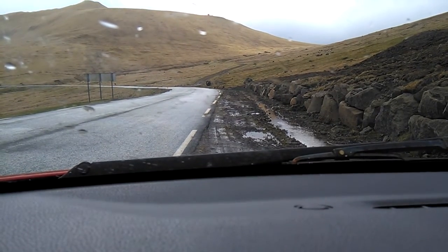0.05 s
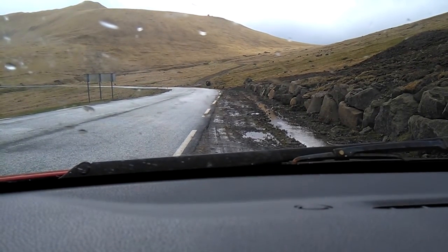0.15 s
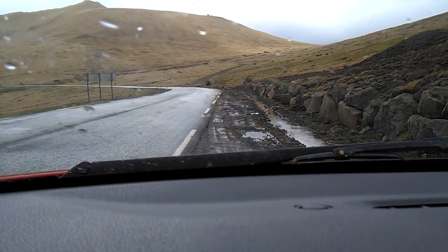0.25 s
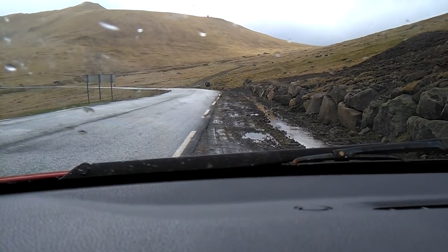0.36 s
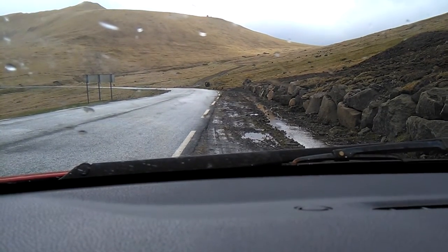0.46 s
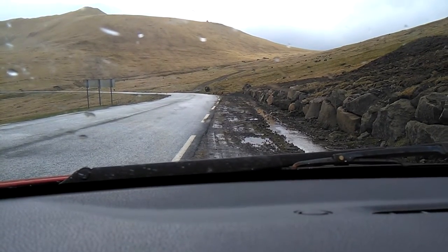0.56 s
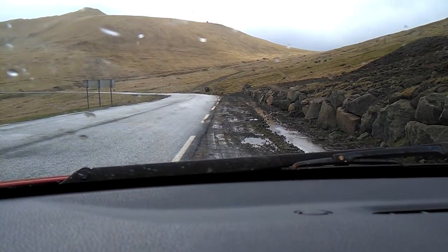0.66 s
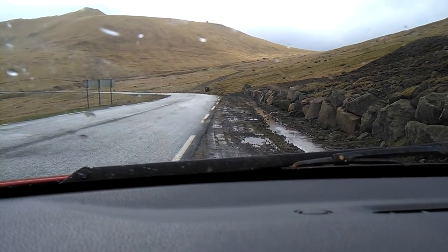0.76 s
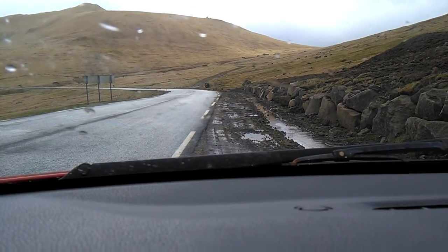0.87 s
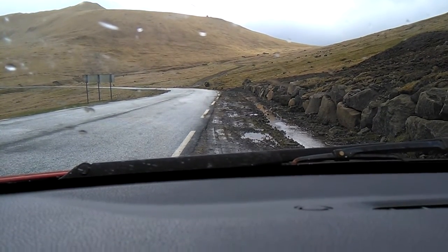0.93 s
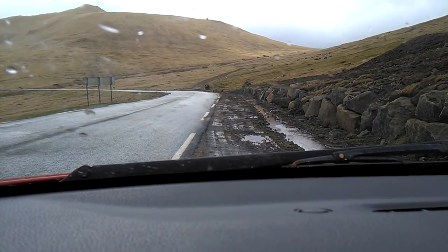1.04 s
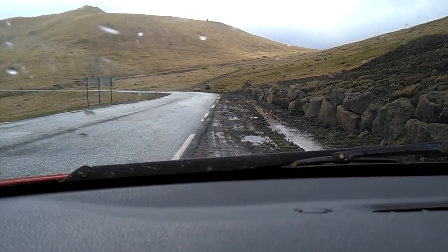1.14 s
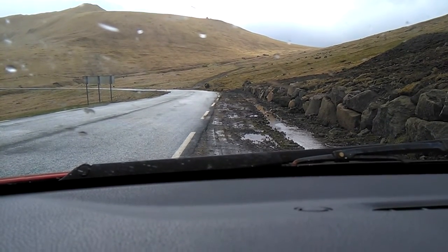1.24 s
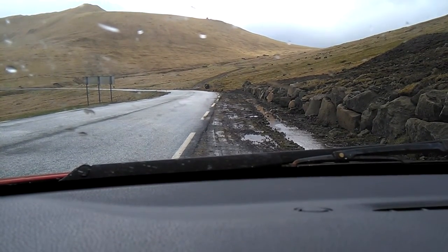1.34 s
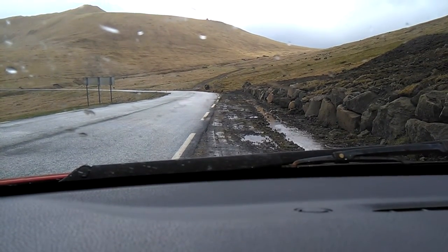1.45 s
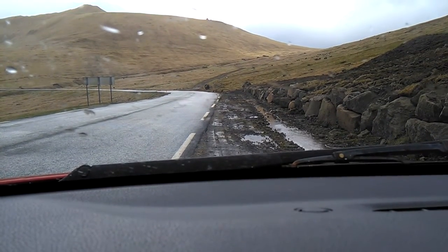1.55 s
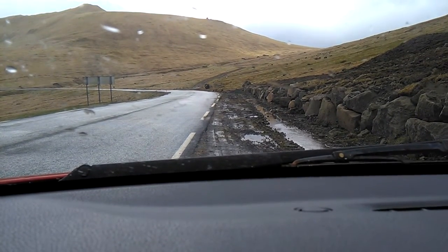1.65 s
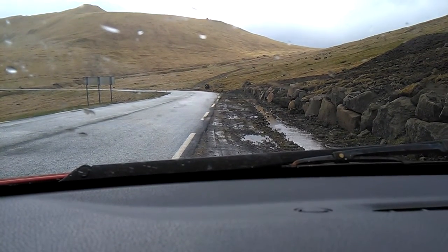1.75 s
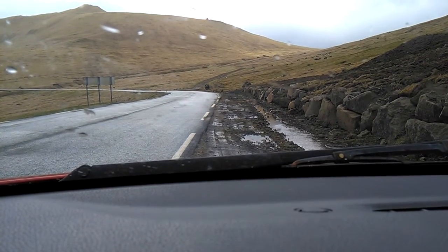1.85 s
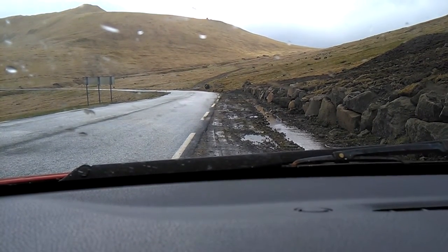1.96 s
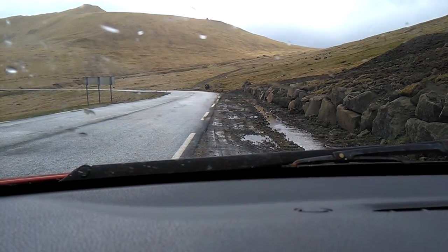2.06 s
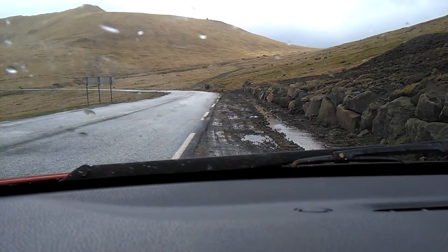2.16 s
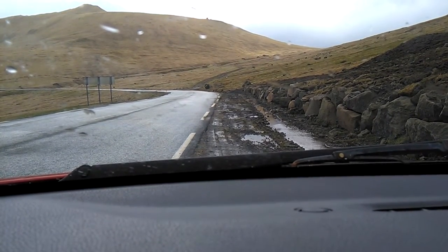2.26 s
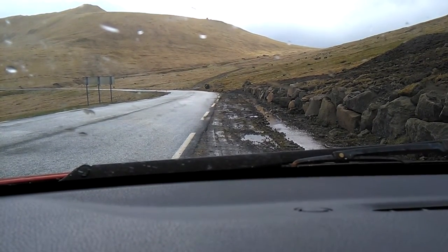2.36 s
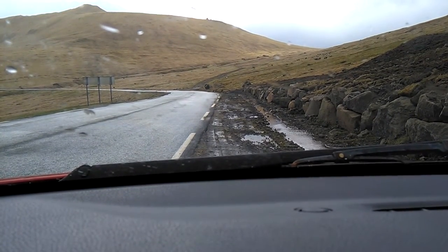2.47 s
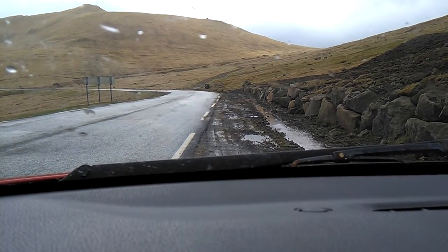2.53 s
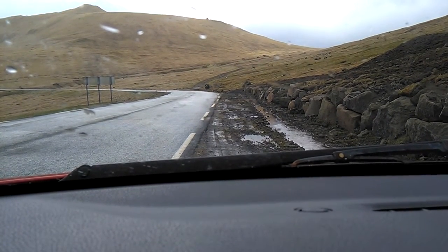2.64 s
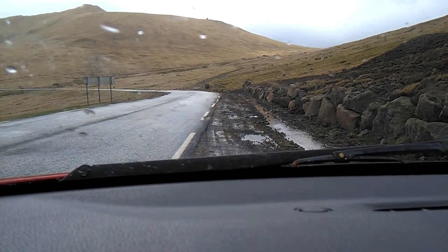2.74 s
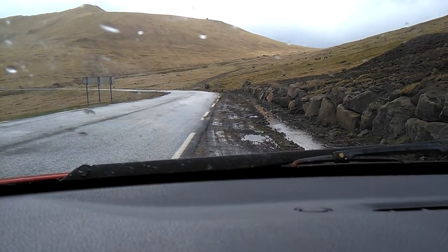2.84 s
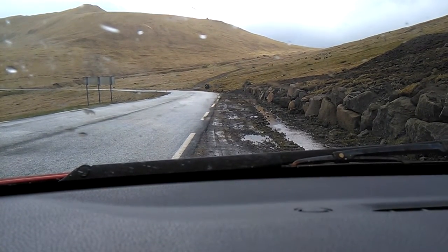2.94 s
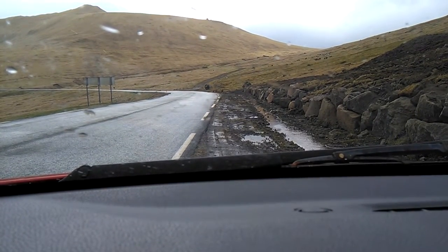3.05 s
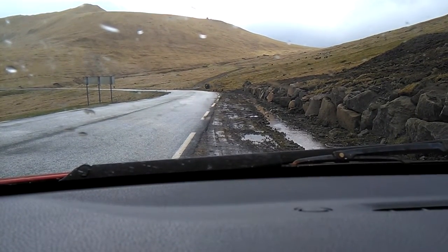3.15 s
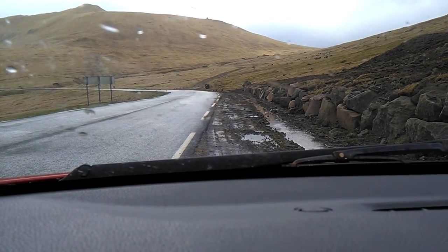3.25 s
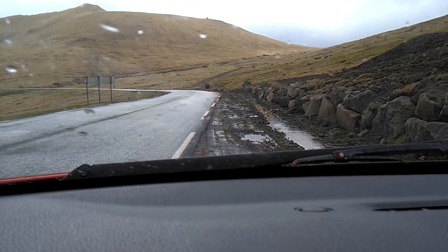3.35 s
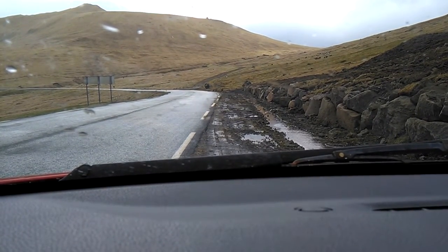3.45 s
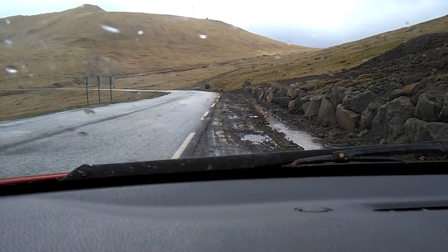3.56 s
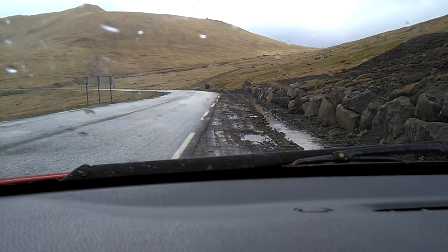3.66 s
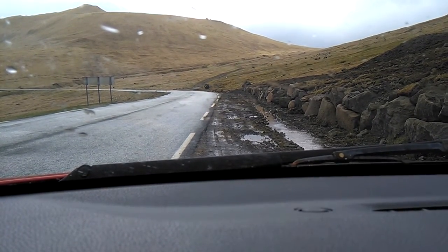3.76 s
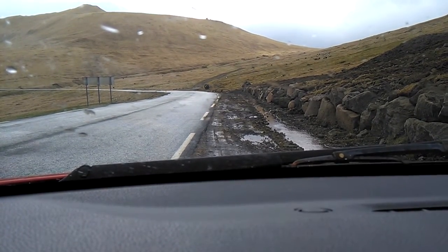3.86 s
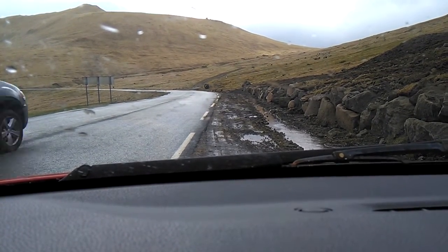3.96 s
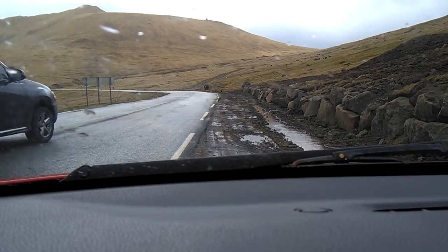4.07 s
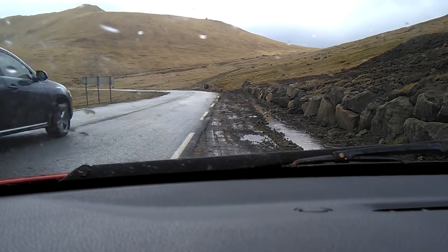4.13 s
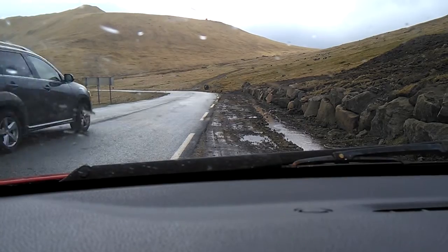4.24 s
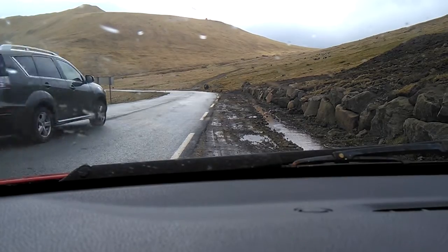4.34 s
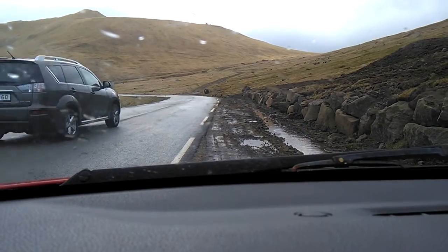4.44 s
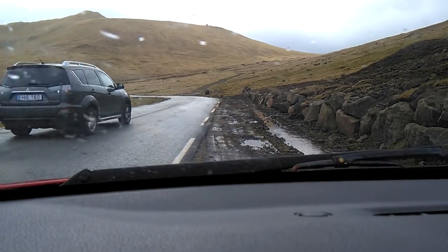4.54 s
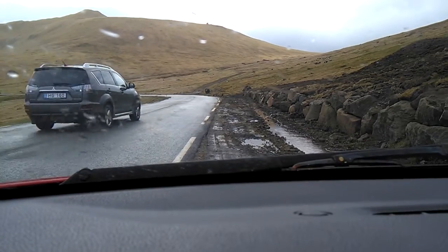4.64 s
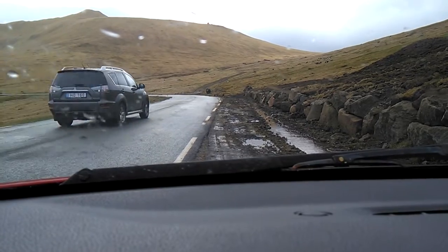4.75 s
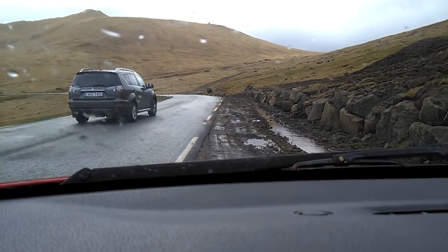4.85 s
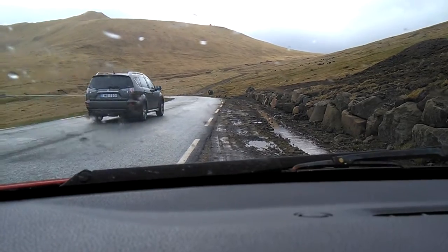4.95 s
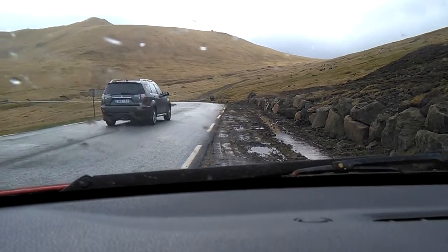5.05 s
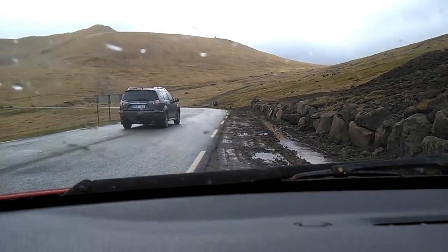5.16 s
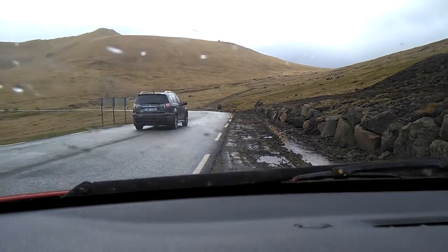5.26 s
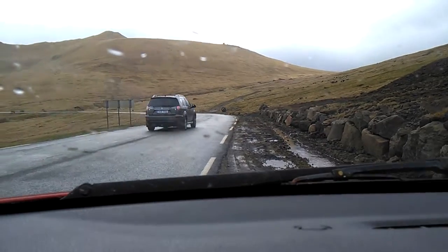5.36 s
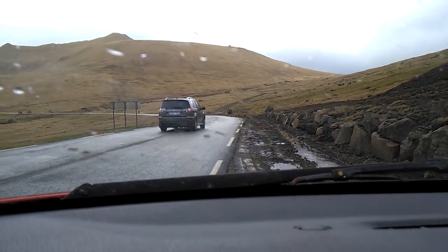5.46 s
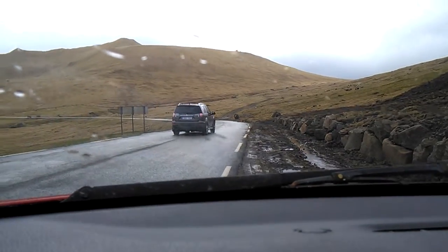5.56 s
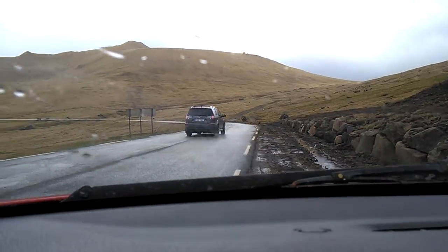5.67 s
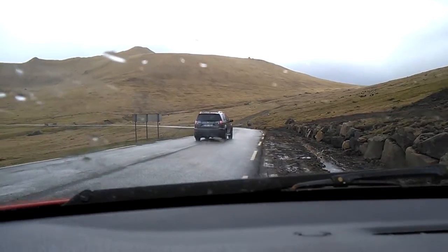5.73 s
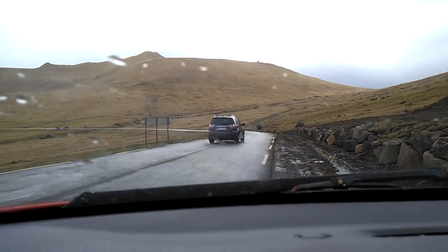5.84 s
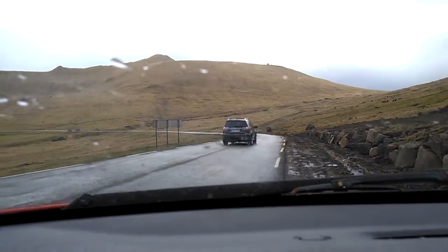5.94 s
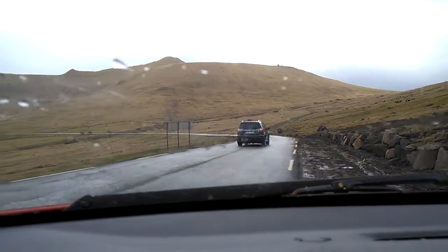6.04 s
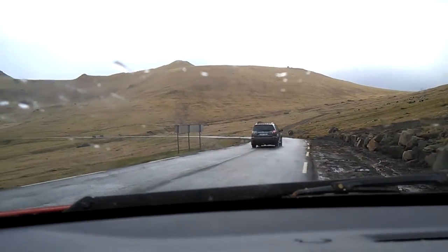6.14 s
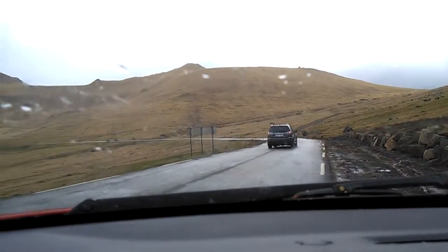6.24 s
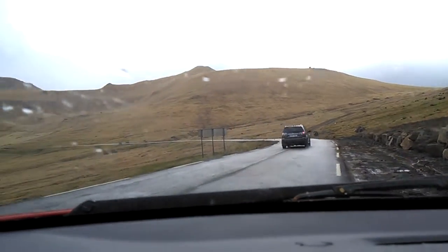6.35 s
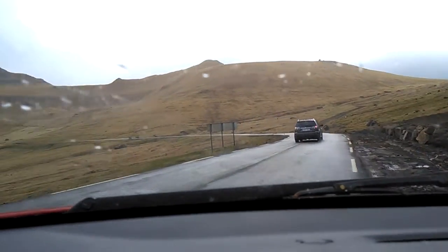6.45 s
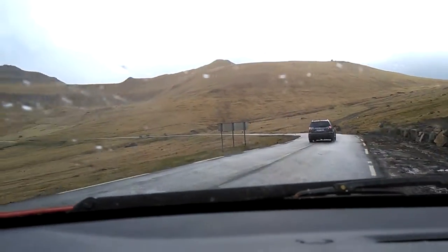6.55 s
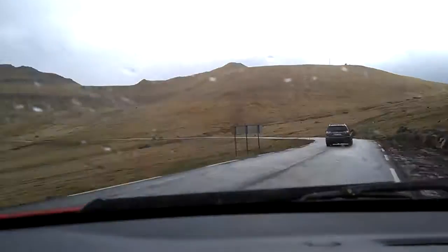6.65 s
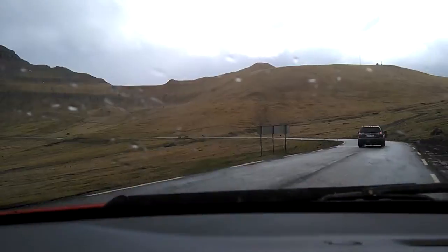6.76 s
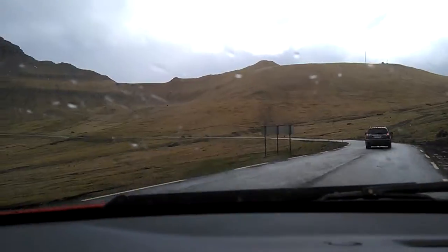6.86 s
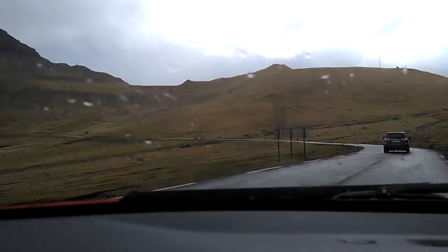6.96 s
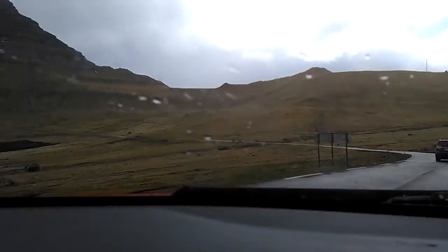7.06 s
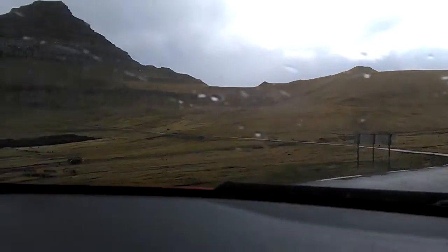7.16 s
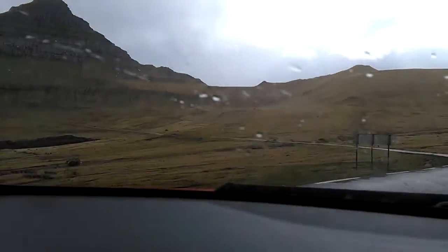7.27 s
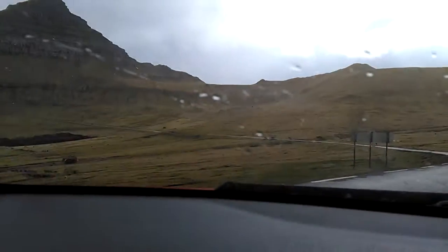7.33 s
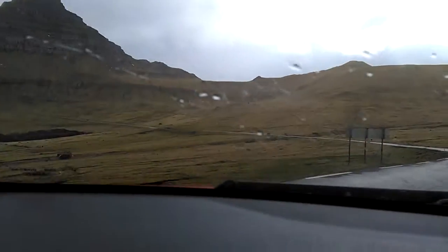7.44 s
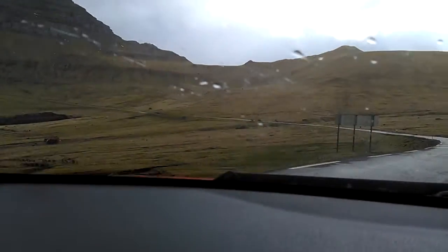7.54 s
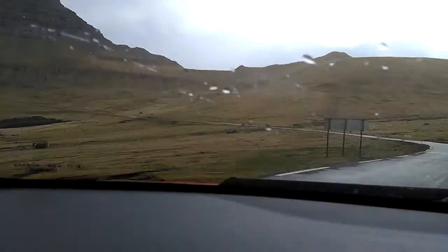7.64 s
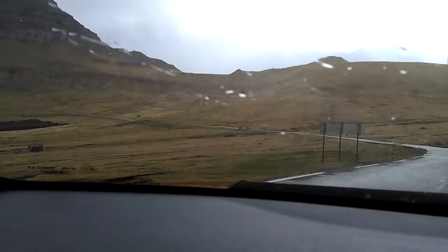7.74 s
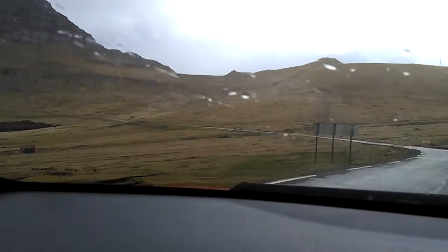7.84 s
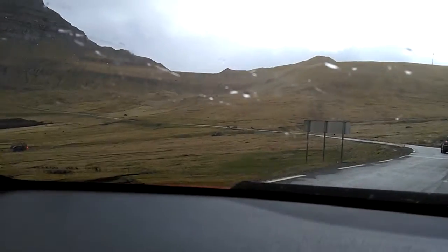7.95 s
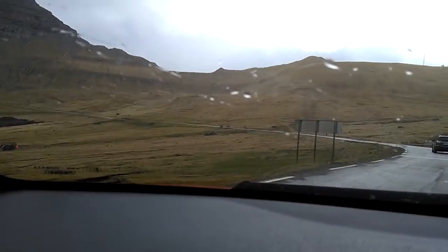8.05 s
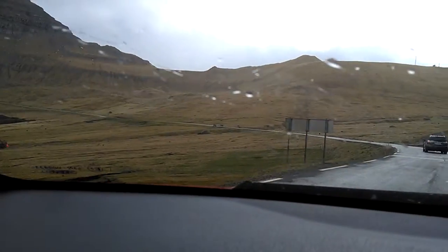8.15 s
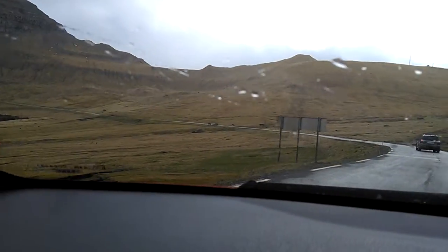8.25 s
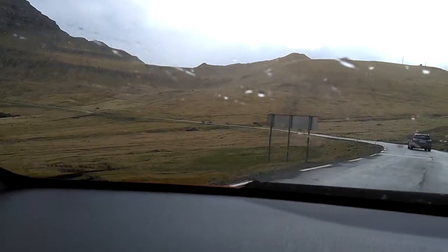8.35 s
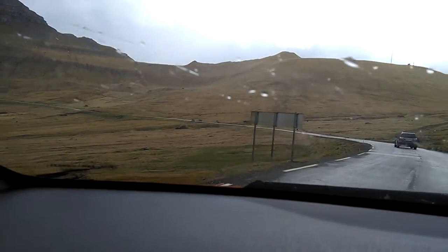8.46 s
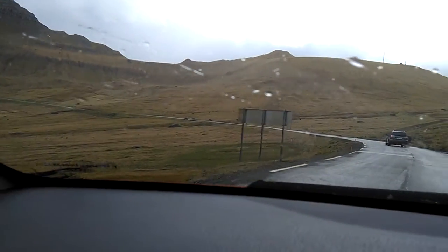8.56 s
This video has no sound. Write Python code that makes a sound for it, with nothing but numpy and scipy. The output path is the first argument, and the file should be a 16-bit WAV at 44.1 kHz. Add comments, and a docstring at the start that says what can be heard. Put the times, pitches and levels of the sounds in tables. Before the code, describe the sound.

Inside a car, a turn signal ticks steadily while the engine and tyre rumble build, with a few knocks and plastic clacks.

```python
"""A small car pulling out, heard from inside.

The car creeps along a roadside with its indicator relay ticking, then pulls out onto asphalt.
Engine harmonics excite the cabin's resonances and boom under load; tyre noise grows with speed.
Soft blows ring the body, plastic controls clack, a hand scrapes the wheel and clothing rustles."""
import sys
import numpy as np
from scipy import signal
from scipy.fft import rfft, irfft
from scipy.io import wavfile
from scipy.ndimage import uniform_filter1d

SR = 44100
rng = np.random.default_rng(int(sys.argv[2]) if len(sys.argv) > 2 else 0)


def dump_mix(stems):
    """Bounce the given channels to the path in sys.argv[1] as a 16-bit WAV at rate SR."""
    frames = np.atleast_2d(stems).T  # one column per channel
    limited = np.clip(frames, -1, 1)  # hard clip at full scale
    pcm = np.round(limited * 32767).astype(np.int16)
    wavfile.write(sys.argv[1], SR, pcm)


N = 379260
T = np.arange(N) / SR


def engine():
    """Periodic forcing: three cylinders fire in each cycle and drive the cabin, gears and a panel."""
    # The engine idles, revs up, sags as the clutch bites, then pulls away.
    # Each row: time in seconds, firing rate in Hz, relative level in dB.
    running = [(0, 47, -47), (2, 48, -45), (3.2, 49, -40), (4.5, 54, -37), (4.75, 56.5, -30),
               (5.05, 61, -27), (5.4, 51.5, -25.5), (5.7, 45.5, -33), (6.08, 48.8, -23.5),
               (6.42, 49.6, -26), (6.8, 46.7, -26), (7.1, 50, -22), (7.4, 54.8, -21.5), (7.98, 60.8, -24),
               (8.3, 65.5, -28), (8.6, 67.5, -31)]
    # Dips and swells of the mid-range. Each row: middle in seconds, width in seconds, gain in dB.
    idle_swells = [(1.223, 0.19, -6), (2.004, 0.24, 1.5), (2.557, 0.2, 3.5), (3.033, 0.21, 2.5),
                   (4.54, 0.093, 7)]
    firing_hz, load_db = curves(running)
    firing_phase = 2 * np.pi * np.cumsum(firing_hz) / SR
    cycle_hz, cycle_phase = firing_hz / 3, firing_phase / 3
    idle_db = gain_swells(idle_swells)
    boom = cabin_boom(cycle_hz, cycle_phase)
    idle = valve_clatter(firing_phase, cycle_phase, idle_db) + cabin_drone(idle_db)
    whine_and_buzz = gear_whine(firing_phase) + panel_buzz()
    waver_db = 1.1 * walk(14)
    return np.sqrt(2) * (boom * undb(load_db - 1.74 + waver_db) + whine_and_buzz) + idle


def cabin_boom(cycle_hz, cycle_phase):
    """Forced vibration: each engine harmonic grows as it sweeps through a resonance of the cabin."""
    # Engine harmonics. Each row: multiple of the cycle rate, relative level in dB.
    orders = [(2, -6.5), (3, 1), (4, -10), (5, -17), (6, -11), (7, -22), (8, -25.5), (9, -16), (10, -24),
              (12, -25), (15, -28), (18, -28.5), (21, -23.5), (24, -31)]
    # The cabin's frequency response. Each row: frequency in Hz, gain in dB.
    response = [(30, -25), (45, 0.5), (56, -1.5), (62, 0), (69, -6), (80, 0), (96, 0.5), (111, 2),
                (122, -6), (134, 6.5), (145, 0.5), (162, 8), (171, 3.5), (182, -4.5), (200, -17), (235, -3),
                (300, -3.5), (550, -7.5)]
    # Throttle presses lift the upper harmonics. Each row: middle and width in seconds, gain in dB.
    throttle = [(4.85, 0.31, 2), (7.314, 0.44, 3.5)]
    pull_db = gain_swells(throttle)
    boom = 0
    for multiple, db in orders:
        cabin_db = np.interp(multiple * cycle_hz, *np.transpose(response))
        shake = min(.1 + .025 * multiple, .5)  # uneven combustion shakes the upper harmonics most
        amplitude = 1 + shake * walk(22)
        phase = multiple * cycle_phase + shake * walk(12) + rng.uniform(0, 2 * np.pi)
        boom = boom + undb(db + cabin_db + (multiple > 3) * pull_db) * amplitude * np.sin(phase)
    return boom


def tyres():
    """Roughness excitation: the ground shakes the suspension and roars in the arches, more at speed."""
    # Road speed. Each row: time in seconds, speed in m/s.
    speed = [(0, 0.69), (2, 0.82), (3, 1.26), (4.1, 1.2), (4.7, 3.4), (6, 4.2), (8.6, 6.3)]
    # Patches of uneven ground. Each row: middle in seconds, width in seconds, rumble gain in dB.
    patches = [(1.624, 0.1, 3.5), (2.49, 0.34, 5.5), (3.34, 0.19, 8.5), (4.3, 0.21, 5.5), (5.33, 0.18, 7.5),
               (5.678, .15, -0.5), (7.267, 0.25, 1.5), (8.378, 0.26, 5.5)]
    # Spectra of rumble and roar. Each row: frequency in Hz, relative spectral density in dB.
    rumble_spectrum = [(20, -40), (33, -11), (45, 4.5), (60, 4.5), (72, 2.5), (100, -1), (130, -5),
                       (176, 0.5), (205, -9), (235, -8.5), (290, -23.5), (450, -72)]
    roar_spectrum = [(150, -37), (240, 6.5), (300, -1), (370, 2), (440, -4.5), (500, -9), (700, -23.5),
                     (1100, -30), (2000, -40.5), (2850, -36), (3500, -41), (9000, -96)]
    asphalt_s, crossing_s, asphalt_db = 6.83, .32, -6  # asphalt roars less than the coarse verge
    speed_decades = np.log10(curves(speed)[0])
    rough_db = gain_swells(patches)
    on_asphalt = np.clip(.5 + (T - asphalt_s) / crossing_s, 0, 1)
    rumble_db = -40.5 + 11.5 * speed_decades + rough_db
    roar_db = -52.5 + 20.5 * speed_decades + .12 * rough_db + asphalt_db * on_asphalt
    rumble = colour(noise() * undb(1.7 * walk(19)), rumble_spectrum) * undb(rumble_db)
    roar = colour(noise() * undb(1.3 * walk(60)), roar_spectrum) * undb(roar_db)
    return rumble + roar


def indicator():
    """Impact and reflection: a relay rings as it shuts and opens, and the upholstery absorbs the echoes."""
    # Relay modes on closing and opening. Each row: frequency in Hz, rise time in seconds, level in dB.
    closing = [(2291, .00194, -29.2), (2592, .003, -44.2), (1620, .002, -50), (1300, .0015, -52),
               (1020, .002, -51)]
    opening = [(1283, .0021, -40), (2270, .0024, -45), (2500, .002, -51), (2810, .0018, -53)]
    # Paths by way of dashboard and glass. Each row: delay in seconds, gain in dB.
    paths = [(0, -5.3), (.00278, 0), (.00636, -8.5), (.01082, -9), (.01462, -7.9), (.01902, -12.5)]
    # Bright spit of the contacts. Each row: frequency in Hz, relative spectral density in dB.
    spit_spectrum = [(3000, -18), (4400, 2), (5600, -21), (7500, 7.5), (9500, 4.5), (11000, -7),
                     (13000, -7), (14200, -3)]
    first_tick_s, flash_s, opens_after_s, timer_step_s = .0659, .686, .3384, .01
    tick_db, tock_db, last_tock_db, scatter_db = -.5, 1.5, 1, .6
    spring_lag_s, rebound_s, rebound_db = .002, .0088, -8
    t, out = T[:SR // 8], np.zeros(N)

    def reflected(modes):
        """Multipath: every mode arrives once along each path."""
        return sum(ring(np.maximum(t - delay, 0), hz, rise, db + path_db)
                   for hz, rise, db in modes for delay, path_db in paths)

    def diffuse(sound, db):
        """Reverberation: the cabin adds a brief diffuse tail."""
        wash = rng.standard_normal(len(t)) * envelope(t, rise=.012, t60=.12)
        return sound + undb(db) * signal.fftconvolve(sound, wash)[:len(t)]

    flashes = flash_s * np.arange(10)
    for s in first_tick_s + timer_step_s * np.round(flashes / timer_step_s):
        db = tick_db + scatter_db * rng.standard_normal()
        add(out, s, undb(db) * diffuse(reflected(closing), -41))
        spit = colour(rng.standard_normal(len(t)), spit_spectrum) * envelope(t, rise=.0029, t60=.16)
        add(out, s - .008, spit * undb(db - 59.5 + 2 * rng.standard_normal()))
    housing, *spring = opening
    for flash in flashes:
        s = first_tick_s + opens_after_s + flash
        db = (last_tock_db if flash == flashes[-1] else tock_db) + scatter_db * rng.standard_normal()
        # The housing knocks straight through the dashboard and rebounds; the spring rings higher.
        for lag, bounce_db in ((0, 0), (rebound_s, rebound_db)):
            add(out, s + lag, undb(db + bounce_db) * diffuse(ring(t, *housing), -32))
        add(out, s + spring_lag_s, undb(db) * diffuse(reflected(spring), -36))
    return out


def thumps():
    """Modal response: each blow rings the body, and a longer contact leaves only the deep modes."""
    # Blows from gearbox and bumps. Each row: start in seconds, level in dB, contact time in seconds.
    blows = [(0.501, -25.5, 0.0013), (0.522, -20, 0.0081), (0.556, -30, 0.02), (0.581, -24.5, 0.0044),
             (.69, -25.5, 0.0099), (1.6, -37.5, 0.0019), (3.215, -42, 0.0023), (3.279, -34, 0.0016),
             (3.299, -29.5, 0.0036), (3.341, -19, 0.015), (3.675, -34, 0.0016), (3.822, -26.5, 0.0061),
             (4.565, -40, 0.0011), (5.82, -26, 0.0032), (6.618, -29, 0.0012), (6.645, -27, 0.0012),
             (6.865, -25, 0.0035), (7.201, -26, 0.0036), (8.051, -42, 0.0025)]
    # Body modes. Each row: frequency in Hz, time to fall 60 dB in seconds, gain in dB.
    modes = [(60.1, 0.43, 3), (106, 0.085, 8), (170.8, 0.13, 5), (214.6, 0.12, 0.5), (333, 0.079, -1.5),
             (410, 0.062, 0), (452, 0.13, -5)]
    t, out = T[:SR // 2], np.zeros(N)
    for s, db, contact in blows:
        for hz, t60, mode_db in modes:
            amplitude = undb(db + mode_db) / (1 + (hz * contact) ** 2)
            add(out, s, amplitude * envelope(t, contact, t60) * np.sin(2 * np.pi * hz * t))
    return out


def control_clacks():
    """Damped free vibration: a struck plastic part gives a burst of noise and rings in its own modes."""
    # Each row: start in seconds, level in dB, time to fall 60 dB in seconds, tilt in dB per octave,
    # main mode in Hz, amplitude ratio of ringing to noise, gain of the side modes in dB.
    clacks = [(.497, -56.5, .13, 14, 3780, 0.82, -7), (1.986, -43, 0.055, -18, 660, 1, -7),
              (3.086, -50.5, .05, 2, 4470, .3, 0), (3.34, -48.5, 0.1, 0, 9500, 1.3, 0),
              (6.187, -45, 0.14, 4, 4220, 0.7, 2), (6.458, -40.5, 0.11, 4.5, 3800, 0.77, -1),
              (6.56, -35.5, 0.025, 3, 5130, 2, -8), (6.565, -46.5, 0.12, 0, 3900, 1.6, 0),
              (6.616, -31.5, 0.08, 2, 1398, 0.63, -1), (6.619, -26, 0.28, -27, 400.3, 2.2, -2),
              (6.641, -37, 0.11, 2.5, 1510, 0.65, -4), (6.663, -42, 0.097, 0, 1500, .3, -2),
              (7.107, -25, .034, -17, 1000, 0.31, 0), (7.677, -45.5, .13, -1, 3020, 1.9, 0),
              (7.761, -34.5, 0.093, -2.5, 2570, 0.61, -4), (7.767, -46, 0.06, -5, 3780, 1, -9),
              (7.785, -49.5, 0.43, -4, 3840, 0.23, 0), (8.006, -54, 0.33, -4.5, 2900, .55, 0),
              (8.514, -40.5, 0.1, 4, 2630, 3.3, -2)]
    # Side modes of a part. Each row: multiple of the main frequency, relative level in dB.
    side_modes = [(0.799, -7.5), (.885, -3), (1.18, -8.5), (1.47, -16.5)]
    # Noise of struck trim. Each row: frequency in Hz, relative spectral density in dB.
    trim_spectrum = [(200, 5), (450, -3), (750, 8), (1300, 7), (2000, 4), (2650, 5), (3400, -2.5),
                     (4800, 3.5), (5600, -4.5), (7400, 2.5), (9300, -5), (11000, -12.5), (14000, -30)]
    t, out = T[:SR // 5], np.zeros(N)

    def loose_mode(hz):
        """Phase diffusion: the part sits loose, which widens its mode to 4% of the frequency."""
        blur = np.cumsum(rng.standard_normal(len(t))) * np.sqrt(2 * np.pi * .04 * hz / SR)
        return np.sin(2 * np.pi * hz * t + blur)

    for s, db, t60, tilt_db, hz, share, side_db in clacks:
        ringing = loose_mode(hz)
        ringing += sum(undb(side_db + mode_db) * loose_mode(hz * ratio) for ratio, mode_db in side_modes)
        burst = colour(rng.standard_normal(len(t)), trim_spectrum, tilt_db)
        add(out, s, undb(db) * unit(burst + share * unit(ringing)) * envelope(t, rise=.0022, t60=t60))
    return out


def wheel_scrape():
    """Sliding friction: a hand judders briefly along the steering wheel."""
    # Each row: frequency in Hz, relative spectral density in dB.
    spectrum = [(300, -1), (450, 8), (620, 8.5), (850, 5.5), (1130, 8), (1380, -10), (1580, -2),
                (2100, -11), (2800, -11), (4000, -16), (8000, -38), (14000, -34)]
    judder_db = 1.5 * walk(60)
    pressure = swell(s=7.215, width=.083) * undb(-40.5 + judder_db)
    return pressure * colour(noise() * undb(1.3 * walk(250)), spectrum)


def clothing():
    """Stick-slip friction: fabric slides in tiny slips and snags, and a firmer stroke adds a rasp."""
    # Strokes of a sleeve. Each row: middle in seconds, width in seconds, level in dB.
    strokes = [(0.066, 0.16, -61.5), (.55, 0.39, -74.5), (2.306, 0.19, -75), (2.96, 0.13, -57.5),
               (3.19, 0.16, -58.5), (3.544, 0.18, -59.5), (3.806, 0.19, -63), (4.3, 0.96, -74.5),
               (4.923, 0.24, -64.5), (5.5, 1, -71), (6.17, 0.24, -53), (6.58, 0.41, -58), (6.865, 0.1, -57),
               (7.02, 0.088, -58), (7.13, 0.085, -60), (7.213, 0.089, -51), (7.394, 0.09, -56),
               (7.625, 0.3, -59.5), (8.3, 0.95, -68)]
    # Spectra of light sliding and firm drag. Each row: frequency in Hz, relative spectral density in dB.
    slide_spectrum = [(1000, -8), (2000, -10.5), (2700, -4), (4300, -8.5), (5500, -14), (7000, -2),
                      (8400, 3), (10000, -4), (12000, -12.5), (14300, -15)]
    drag_spectrum = [(1500, -26), (2900, -28), (4500, 1), (5600, 6.5), (7000, -3), (10000, 8), (14000, -9)]
    snags_per_s, snag_db, snag_scatter_db = 260, -8, 3.5
    stroke = swells(strokes)
    slips = undb(1.3 * walk(22) + 1.1 * walk(60) + 1.3 * walk(700) - .2)
    snags = (rng.random(N) < snags_per_s / SR) * np.sign(noise()) * undb(snag_scatter_db * noise())
    friction = colour(noise() * slips + undb(snag_db) * unit(snags), slide_spectrum)
    slide = flutter(friction, depth_db=2.2, band_hz=800, hold_s=.03)  # the folds shift the colour
    drag = colour(noise() * slips * undb(2.1 * walk(200)), drag_spectrum)
    return slide * stroke + drag * undb(-55) * (stroke / undb(-49.5)) ** 1.8


def cabin_drone(idle_db):
    """Resonance: the cabin's cavity and panels pick narrow bands out of broadband noise."""
    # The cavity, then the panels. Each row: frequency in Hz, nominal width in Hz, level in dB.
    resonances = [(176, 26, -45.5), (634, 20.6, -60.5), (683.5, 34, -69), (827, 75, -67),
                  (909.5, 30, -69.5), (1020, 33, -68), (1182, 17, -76), (1566, 31, -76)]
    cavity, *panels = [undb(db) * resonate(noise(), hz, width) for hz, width, db in resonances]
    return cavity * undb(1.95 * walk(10)) + sum(panels) * undb(idle_db + 2 * walk(15))


def valve_clatter(firing_phase, cycle_phase, idle_db):
    """Amplitude modulation: valve noise throbs with each firing and each engine cycle."""
    # Each row: frequency in Hz, relative spectral density in dB.
    spectrum = [(180, -34), (300, -4), (336, -1.5), (450, -8), (550, -4.5), (605, -11.5), (660, -4),
                (750, -8.5), (813, -11), (1020, -9), (1120, -15.5), (1250, -17.5), (1970, -20), (2510, -23),
                (2850, -25.5), (3240, -34), (10500, -40.5), (14000, -50)]
    throb = 1 + .11 * np.cos(firing_phase) + .04 * np.cos(cycle_phase)
    clatter = colour(noise() * throb * undb(1.6 * walk(25)), spectrum)
    return flutter(clatter, depth_db=2, band_hz=180, hold_s=.04) * undb(-54 + .43 * idle_db)


def gear_whine(firing_phase):
    """Tooth meshing: a tone locked to engine speed surges together with the octave below."""
    # Each row: middle and width in seconds, level of the tone in dB, level of the octave below in dB.
    surges = [(7.795, 0.059, -54, -64), (7.943, 0.034, -60, -60), (8.16, 0.098, -54.5, -56),
              (8.41, 0.086, -56.5, -55), (8.522, 0.019, -45, -57), (8.57, 0.06, -55, -46)]
    mesh_phase = 15.15 * firing_phase + .9 * walk(50)
    upper = swells([(s, width, db) for s, width, db, _ in surges]) * undb(2 * walk(45))
    lower = swells([(s, width, db) for s, width, _, db in surges]) * undb(2 * walk(35))
    return upper * np.sin(mesh_phase) + lower * np.sin(mesh_phase / 2)


def panel_buzz(hz=642):
    """Sympathetic vibration: under load a panel buzzes in bursts around its natural frequency."""
    # Each row: middle in seconds, width in seconds, level in dB.
    bursts = [(7.86, .06, -54), (8.09, 0.041, -45), (8.17, .04, -49), (8.29, .12, -50.5),
              (8.39, 0.072, -46.5), (8.53, 0.097, -52)]
    return np.sin(2 * np.pi * hz * T + 1.4 * walk(75)) * undb(1.8 * walk(60)) * swells(bursts)


def fuel_pump():
    """Rotational tone: the pump hums thinly, wavering and sagging a little in pitch."""
    # Each row: time in seconds, frequency in Hz.
    pitch = [(0, 584.5), (.69, 584), (1.22, 566), (2.3, 583), (3.24, 579.5), (4.2, 585)]
    phase = 2 * np.pi * np.cumsum(curves(pitch)[0]) / SR + .27 * walk(7.1)
    return np.sqrt(2) * np.sin(phase) * undb(-63.5 + .91 * walk(5.5))


def undb(db):
    """Decibels to amplitude gain."""
    return 10 ** (np.asarray(db) / 20)


def unit(x):
    """Normalisation to rms 1."""
    return x / np.sqrt(np.mean(x ** 2))


def noise():
    """Gaussian white noise."""
    return rng.standard_normal(N)


def walk(rate):
    """Random modulation: levels held for 1 / rate seconds and smoothed twice; rms 1."""
    hold = max(int(SR / rate), 1)
    steps = np.repeat(rng.standard_normal(N // hold + 1), hold)
    return unit(uniform_filter1d(uniform_filter1d(steps, hold), hold)[:N])


def curves(table):
    """Linear interpolation of each later column over the times in the first."""
    s, *columns = np.transpose(table)
    return [np.interp(T, s, column) for column in columns]


def colour(x, points, tilt_db=0):
    """Spectral shaping by (Hz, dB) points, tilted per octave above the second point; rms 1."""
    hz, db = np.transpose(points)
    octave = np.log2(np.maximum(np.fft.rfftfreq(len(x), 1 / SR), 1))
    gain_db = np.interp(octave, np.log2(hz), db) + tilt_db * np.maximum(octave - np.log2(hz[1]), 0)
    return unit(irfft(rfft(x) * undb(gain_db), len(x)))


def resonate(x, hz, width):
    """Two resonators in cascade give a steep peak; rms 1."""
    b, a = signal.iirpeak(hz, hz / (1.25 * width), fs=SR)
    return unit(signal.lfilter(b, a, signal.lfilter(b, a, x)))


def flutter(x, depth_db, band_hz, hold_s):
    """Band-wise modulation: each narrow band wavers in level on its own; rms 1."""
    spectrum = signal.stft(x, nperseg=512)[2]
    field = rng.standard_normal(spectrum.shape)
    for axis, span in enumerate((band_hz * 512 / SR, hold_s * SR / 256)):
        size = max(int(span), 1)
        field = uniform_filter1d(uniform_filter1d(field, size, axis=axis), size, axis=axis)
    return unit(signal.istft(spectrum * undb(depth_db * unit(field)))[1][:N])


def envelope(t, rise, t60):
    """Exponential attack, and a decay of 60 dB in t60 seconds."""
    return (1 - np.exp(-t / rise)) * np.exp(-np.log(1000) * t / t60)


def ring(t, hz, rise, db):
    """A damped mode that builds for its rise time and then dies."""
    return undb(db) * (t / rise) ** 2 * np.exp(2 - 2 * t / rise) * np.sin(2 * np.pi * hz * t)


def swell(s, width):
    """A Gaussian pulse around time s, its width taken at half power."""
    return .5 ** (2 * ((T - s) / width) ** 2)


def swells(table):
    """Power summation: the joint amplitude of several swells."""
    return np.sqrt(sum((undb(db) * swell(s, width)) ** 2 for s, width, db in table))


def gain_swells(table):
    """A gain curve in dB, summed from smooth rises and dips."""
    return sum(db * swell(s, width) for s, width, db in table)


def add(out, s, sound):
    """Superposition: mix a sound in at time s."""
    i = max(int(s * SR), 0)
    out[i:i + len(sound)] += sound[:max(len(out) - i, 0)]


def scene():
    """Superposition of all sources at the front seat, in one channel."""
    car = engine() + fuel_pump() + tyres() + indicator() + thumps()
    return (car + control_clacks() + wheel_scrape() + clothing())[None]


def record(dry):
    """Band limiting thins the deepest bass and cuts the top; the sound starts and stops softly."""
    low_hz, top_hz, edge_s = 24, 14200, .004
    thin = signal.sosfilt(signal.butter(2, low_hz, "high", fs=SR, output="sos"), dry)
    edges = np.clip(np.minimum(T, T[-1] - T) / edge_s, 0, 1)
    return signal.sosfilt(signal.ellip(12, .2, 80, top_hz, fs=SR, output="sos"), thin * edges)


dry = scene()
out = record(dry)
dump_mix(out)
```